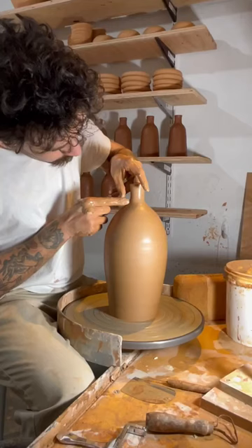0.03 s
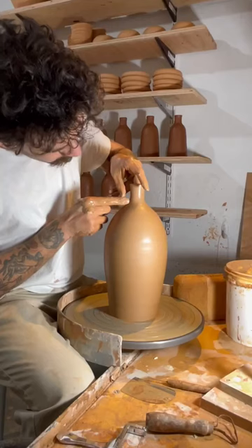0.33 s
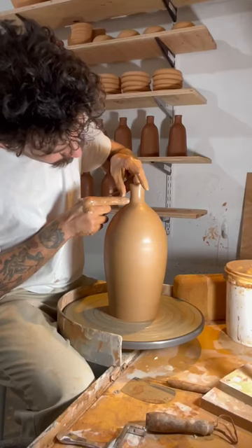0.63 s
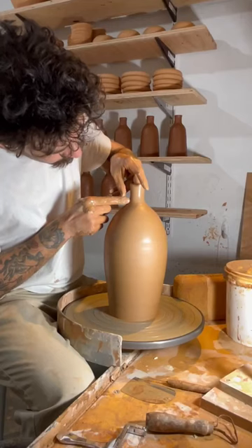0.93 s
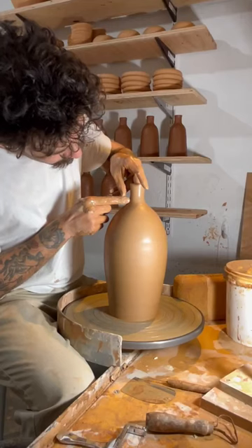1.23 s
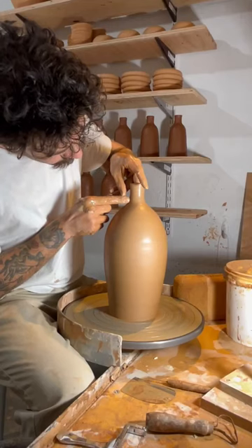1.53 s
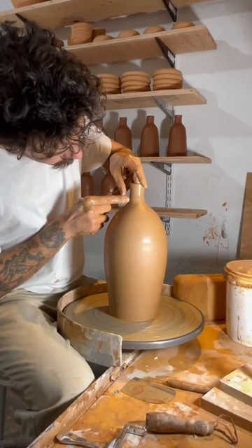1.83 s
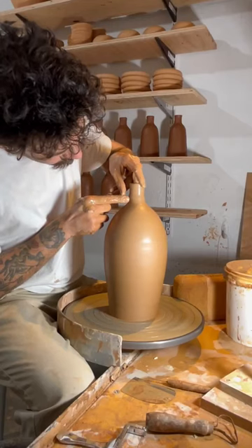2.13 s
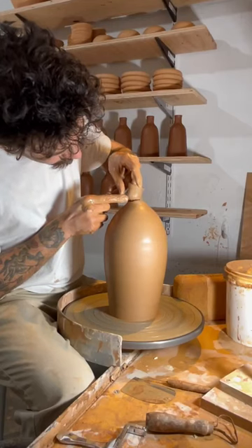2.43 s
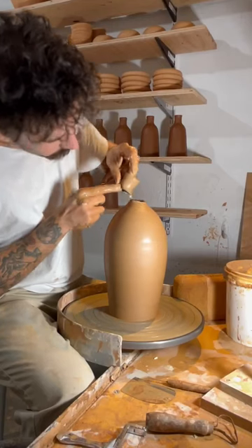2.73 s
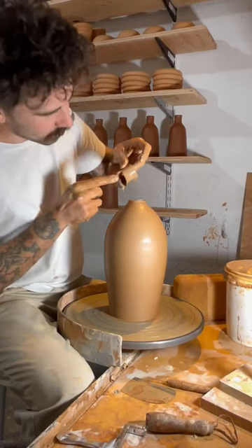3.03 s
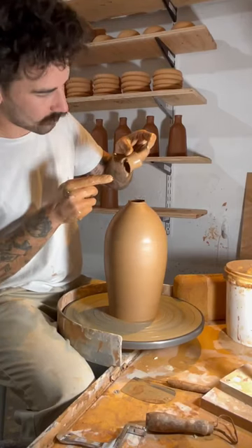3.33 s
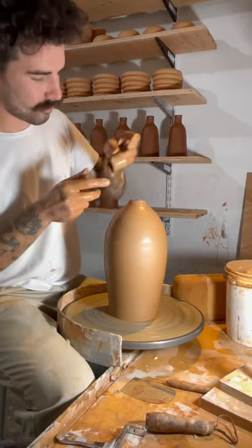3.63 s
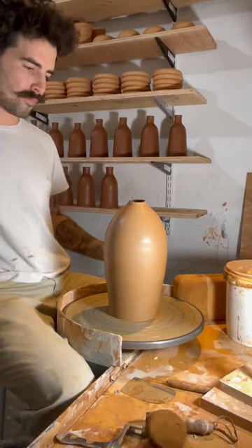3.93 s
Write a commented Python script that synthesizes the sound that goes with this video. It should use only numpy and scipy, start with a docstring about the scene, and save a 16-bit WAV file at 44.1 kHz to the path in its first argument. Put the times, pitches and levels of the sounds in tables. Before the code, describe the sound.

An electric pottery wheel hums steadily, with a few dull bumps as clay is handled.

```python
"""In a small workshop, an electric pottery wheel turns steadily.
The motor hums at harmonics of the mains, the frame drones in slow swells, and friction in the drive
excites the housing's resonances, whirring in time with the rotor over a rumble and a hiss.
Fingers rub the wet clay in short bursts of noise. Handling a torn-off lump rings the frame's modes
in a few dull bumps, and the lump lands with a soft, hollow pat."""
import sys
import numpy as np
from scipy import signal
from scipy.fft import rfft, irfft
from scipy.io import wavfile

SR = 44100
rng = np.random.default_rng(int(sys.argv[2]) if len(sys.argv) > 2 else 0)


def inscribe(sig):
    """Save sig as 16-bit PCM at rate SR to the path in sys.argv[1].

    A 1-D sig is mono; a 2-D sig holds one channel per row.
    Samples are clipped to [-1, 1] before scaling.
    """
    pcm = np.round(np.clip(np.atleast_2d(sig).T, -1, 1) * 32767)
    wavfile.write(sys.argv[1], SR, pcm.astype(np.int16))


N = 176400
T = np.arange(N) / SR
HZ = np.maximum(np.arange(N // 2 + 1) * SR / N, 1)
ROTOR_HZ = 10.37


def from_db(db):
    """Amplitude grows tenfold for every 20 dB."""
    return 10 ** (np.asarray(db) / 20)


def rms_one(x):
    """Normalisation to unit mean power."""
    return x / np.sqrt(np.mean(x ** 2) + 1e-20)


def over_hz(points):
    """Linear interpolation on a log-frequency axis."""
    hz, value = np.transpose(points)
    return np.interp(np.log(HZ), np.log(hz), value)


def drift(rate_hz):
    """Low-passed noise: a slow random fluctuation of rms 1."""
    return rms_one(irfft(rfft(rng.standard_normal(N)) / (1 + (HZ / rate_hz) ** 2), N))


def noise(shape):
    """Shaped stereo noise of rms 1; the balance of mid and side sets the interaural coherence."""
    # likeness of the two ears: (frequency [Hz], coherence [0-1])
    coherence = [(200, .995), (330, .93), (480, .45), (700, .5), (950, .52), (2000, .6), (2800, .2),
                 (4800, .35), (5500, .7), (5900, 1), (6200, 1), (6800, .7), (8000, .85), (9600, .9),
                 (9900, 1), (10700, 1), (11200, .92), (13500, .9), (14200, 1)]
    alike = np.clip(over_hz(coherence), 0, 1)
    mid, side = rfft(rng.standard_normal((2, N)))
    ears = np.sqrt(1 + alike) * mid + np.sqrt(1 - alike) * side * [[1], [-1]]
    return rms_one(irfft(shape * ears, N))


def tone(hz):
    """A sinusoid of rms 1 whose phase is the integral of its frequency."""
    return np.sqrt(2) * np.sin(2 * np.pi * (np.cumsum(hz * np.ones(N)) / SR + rng.random()))


def wavering(lines, depth, wander_hz, rate_hz):
    """Random amplitude and frequency modulation, independent for each tone."""
    return sum(
        from_db(db) * rms_one((1 + depth * drift(rate_hz)) * tone(hz + wander_hz * drift(rate_hz)))
        for hz, db in lines)


def pulsing(orders):
    """Amplitude modulation at multiples of the rotor rate."""
    return 1 + sum(depth * np.cos(2 * np.pi * (k * ROTOR_HZ * T + rng.random())) for k, depth in orders)


def strike(start_s, modes, contact_s):
    """Damped modes build up during a soft contact, then ring freely."""
    age = np.maximum(T - start_s, 0)
    ring = sum(from_db(db - 60 * age / t60) * np.sin(2 * np.pi * hz * age) for hz, db, t60 in modes)
    return (1 - np.exp(-age / contact_s)) * ring


def swell(start_s, attack_s, decay_s):
    """An envelope of linear rise and exponential decay."""
    age = np.maximum(T - start_s, 0)
    return np.minimum(age / attack_s, 1) * np.exp(-age / decay_s)


def reflections(ripple_db=1.6, spacing_hz=30):
    """Interference from nearby surfaces leaves random peaks and dips in a spectrum."""
    heights = rng.standard_normal(len(HZ))
    return from_db(ripple_db * np.interp(HZ / spacing_hz, np.arange(len(heights)), heights))


def wheel_rumble(level_db=-50.5):
    """The running wheel radiates broadband noise, strongest in the bass."""
    # rumble spectrum: (frequency [Hz], relative density [dB])
    spectrum = [(22, -52), (34, -16), (45, -4.5), (62, 4.5), (80, -6), (105, -8), (135, 5), (165, 3.5),
                (185, -5.5), (215, -6), (250, 1.5), (280, -14), (320, -5), (400, -11), (490, -9),
                (580, -13.5), (680, -21.5), (1200, -44), (4000, -87)]
    return from_db(level_db) * noise(from_db(over_hz(spectrum)))


def drive_hiss(level_db=-60.5, flutter_db=.25):
    """Friction noise from the drive, coloured by reflections and modulated by the rotation."""
    # hiss spectrum: (frequency [Hz], relative density [dB])
    spectrum = [(500, -9.5), (750, -1), (1150, -0.5), (1330, -4.5), (1550, -7.5), (2100, -4.5),
                (2700, -2.5), (2980, -9.5), (3400, -5.5), (4200, -8), (5200, -11), (6100, -11.5),
                (8500, -13.5), (10600, -16.5), (12300, -16), (14000, -17.5), (15500, -33)]
    # swell and pulsing: (rate [x rotor rate], depth [ratio])
    orders = [(.46, 0.14), (1, 0.16), (3, 0.023), (4, 0.017), (10, 0.04), (16, 0.02)]
    gain = from_db(level_db + flutter_db * drift(rate_hz=6))
    return gain * noise(from_db(over_hz(spectrum)) * reflections()) * pulsing(orders)


def housing_whirr():
    """Resonance: the housing filters the drive's rubbing into narrow bands that pulse on each turn."""
    # housing resonances: (frequency [Hz], width [Hz], level [dB])
    resonances = [(820, 37, -75.5), (920.4, 72, -66), (1010, 41, -68), (1123, 50, -73.5), (1410, 37, -79),
                  (1760, 75, -74), (2378, 47, -69), (2626, 110, -73.5), (3866, 190, -77), (4624, 59, -80.5),
                  (7750, 160, -83), (8550, 99, -91.5)]
    # pulsing of the whirr: (rate [x rotor rate], depth [ratio])
    orders = [(1, 0.23), (2, 0.2), (3, 0.077), (4, 0.11), (5, 0.058), (7, 0.079), (8, 0.055)]
    power = 0
    for hz, width, db in resonances:
        peak = 1 / (1 + (2 * (HZ - hz) / width) ** 2) ** 1.1
        power += (from_db(db) * rms_one(peak)) ** 2
    return np.sqrt(power.mean()) * noise(np.sqrt(power)) * pulsing(orders)


def drive_tones():
    """The drive's line spectrum: low tones waver, and thin whines throb with the rotor."""
    # low tones: (frequency [Hz], level [dB])
    low_lines = [(59.2, -60), (62.3, -60), (130.3, -74.5), (147.6, -62.5), (155.2, -60.5), (200.2, -63),
                 (210.6, -60.5), (247.8, -64.5), (310.5, -73.5), (368.8, -65.5), (373.4, -74.5),
                 (393.5, -72), (415, -75), (454, -75), (518, -75.5), (612, -80.5)]
    # whines: (frequency [Hz], level [dB])
    high_lines = [(757, -76.5), (946.7, -70), (1012, -73), (1933, -82), (2375, -78.5), (2400, -90),
                  (2617, -76), (2725, -87), (2815, -82), (3165, -81), (3490, -88.5)]
    # throb of the whines: (rate [x rotor rate], depth [ratio])
    orders = [(1, 0.28), (2, 0.48), (3, 0.22)]
    lows = wavering(low_lines, depth=.2, wander_hz=.51, rate_hz=2.1)
    whines = wavering(high_lines, depth=.71, wander_hz=3.23, rate_hz=11.8)
    return lows + whines * pulsing(orders)


def frame_drone(hz=152.6, trim_db=-.5):
    """The frame vibrates at one frequency under slow amplitude modulation."""
    # swells of the drone: (time [s], level before trim [dB])
    envelope = [(.05,-47),(.2,-44),(.24,-54),(.33,-44.5),(.53,-39),(.64,-44),(.72,-54.5),(1.22,-54.5),(1.33,-40.5),(1.42,-54.5),(1.71,-49.5),(1.78,-41.5),(2.07,-38.5),(2.21,-44.5),(2.3,-48),(2.37,-45),(2.57,-43.5),(2.7,-57),(2.82,-39.5),(2.93,-45),(3.0,-58),(3.26,-42),(3.5,-46),(3.7,-45),(3.84,-51),(4,-66)]
    return from_db(trim_db + np.interp(T, *np.transpose(envelope))) * tone(hz)


def motor_hum(overtone_hz=359.7):
    """Forced vibration at even harmonics of the mains; one overtone comes and goes."""
    # steady harmonics: (frequency [Hz], level [dB])
    harmonics = [(120, -48.5), (240.1, -58), (480.2, -71.5), (600.2, -72.5)]
    # unsteady overtone: (time [s], level [dB])
    envelope = [(.05, -54.5), (.22, -70), (.3, -55), (.43, -52.5), (.52, -64), (.75, -59.5), (1.04, -64),
                (1.3, -57), (1.62, -69.5), (1.76, -57.5), (2.0, -61.5), (2.2, -53.5), (2.29, -64.5),
                (2.55, -57), (2.83, -58), (2.93, -66), (3.14, -72), (3.25, -59), (3.7, -60.5), (3.8, -54.5),
                (3.9, -62), (4, -52)]
    steady = sum(from_db(db) * tone(hz) for hz, db in harmonics)
    return steady + from_db(np.interp(T, *np.transpose(envelope))) * tone(overtone_hz)


def frame_bumps():
    """Impact excitation: each bump rings the frame's modes as a low boom and a hollow knock."""
    # bumps on the frame: (time [s], boom gain [dB], knock gain [dB])
    bumps = [(.036, -36, -55), (2.185, -39, -59), (2.239, -44, -50), (2.876, -36, -40.5),
             (2.906, -33.5, -45), (2.967, -34.5, -49), (3.484, -52, -30), (3.495, -48, -22),
             (3.539, -26, -44), (3.578, -46, -30), (3.659, -50, -37)]
    # two sets of frame modes: (frequency [Hz], relative level [dB], 60 dB decay time [s])
    boom_modes = [(46.7, -12, 0.39), (60, 2.5, .26)]
    knock_modes = [(140, -4, 0.28), (178.8, -8.5, 0.23), (210, -9, 0.31), (239.1, -6, 0.25),
                   (272.2, -13.5, 0.28), (352, -17.5, 0.165), (418, -23, 0.14)]
    return sum(from_db(boom_db) * strike(start_s, boom_modes, contact_s=.012)
               + from_db(knock_db) * strike(start_s, knock_modes, contact_s=.01)
               for start_s, boom_db, knock_db in bumps)


def finger_rubs():
    """Sliding friction on wet clay gives short bursts of band-limited noise."""
    # touches: (time [s], gain [dB], centre [Hz], half-width [octaves], attack [s], decay [s])
    touches = [(.425, -57, 700, 0.48, .01, 0.019), (.61, -54.5, 2000, 1.1, 0.027, 0.042),
               (.655, -56, 4250, .4, 0.012, 0.027), (.8, -59.5, 2100, 0.69, 0.014, 0.069),
               (1.245, -58, 1180, .8, .009, 0.022), (1.48, -58, 4000, .7, .012, 0.026),
               (1.62, -56.5, 1090, .15, 0.023, .07), (1.67, -64, 3870, .45, 0.022, 0.1),
               (1.965, -48.5, 910, .4, 0.0099, 0.02), (2.69, -58, 1040, .2, .018, 0.057),
               (3.12, -54, 1250, 1.1, .0065, 0.017), (3.29, -53.5, 1130, 0.081, .037, 0.063),
               (3.57, -60, 4230, 0.68, 0.037, 0.094), (3.69, -57.5, 4000, 0.72, 0.019, 0.037),
               (3.965, -48.5, 4060, 2.3, 0.024, 0.043), (3.978, -67, 12600, .24, .015, .1)]
    rubs = 0
    for start_s, db, hz, octaves, attack_s, decay_s in touches:
        band = 1 / np.sqrt(1 + (np.log2(HZ / hz) / octaves) ** 4)
        skirts = np.exp(-np.abs(np.log(HZ / hz)) / 2)
        rubs += from_db(db) * swell(start_s, attack_s, decay_s) * noise(band * skirts)
    return rubs


def clay_pat(gain_db=-46):
    """Inelastic impact: the lump lands with a broad, hollow, quickly damped burst of noise."""
    # pat spectrum: (frequency [Hz], relative density [dB])
    spectrum = [(200, -14), (400, -4), (570, 2.5), (800, -6.5), (1020, -10), (1300, -6), (1600, -5.5),
                (1900, -10), (2400, -10), (3300, -15.5), (4300, -27), (5600, -29), (9000, -40)]
    envelope = swell(start_s=3.718, attack_s=.004, decay_s=.035)
    return from_db(gain_db) * envelope * noise(from_db(over_hz(spectrum)))


def scene():
    """The sources superpose and reach the ears with interaural level and phase differences."""
    # level between the ears: (frequency [Hz], left minus right [dB])
    tilt = [(60, 0), (125, -1.86), (200, -0.5), (360, -4.5), (700, 0.5), (1290, -.5), (2000, -.3),
            (2500, -2.5), (4400, -2), (6000, -0.5)]
    # phase between the ears: (frequency [Hz], left lead [rad])
    lead = [(30, 0), (350, -.12), (560, -.9), (850, -.2), (1350, -.7), (2100, .4), (2800, 2.0), (3700, -.7),
            (4700, 0), (6000, 3.14), (7900, 6.2), (10200, 9.42), (12400, 12.56), (14400, 15.7)]
    wheel = motor_hum() + drive_tones() + frame_drone() + housing_whirr() + drive_hiss() + wheel_rumble()
    handling = frame_bumps() + finger_rubs() + clay_pat()
    ears = np.array([[.5], [-.5]])  # each ear takes half, with opposite sign
    transfer = from_db(ears * over_hz(tilt)) * np.exp(1j * ears * over_hz(lead))
    return irfft(rfft(wheel + handling) * transfer, N)


def record(dry):
    """Band limiting: a steep low-pass cuts the top treble; the sound starts just after zero."""
    start_s, cutoff_hz = .035, 15700
    low_pass = signal.cheby2(12, 70, cutoff_hz, fs=SR, output="sos")
    return signal.sosfilt(low_pass, dry * (T >= start_s))


dry = scene()
out = record(dry)
inscribe(out)
```